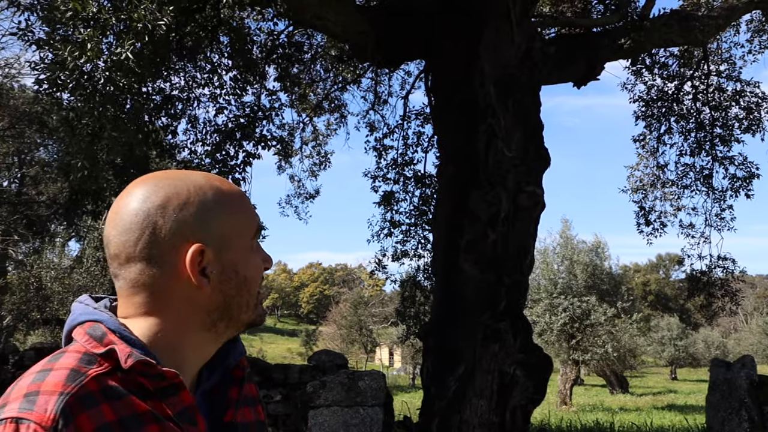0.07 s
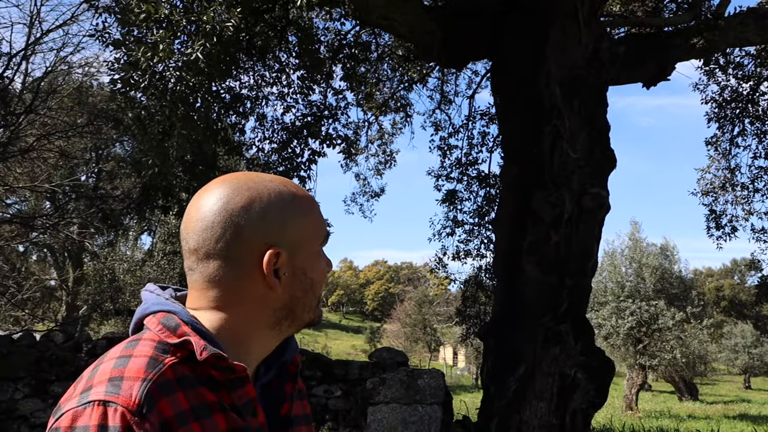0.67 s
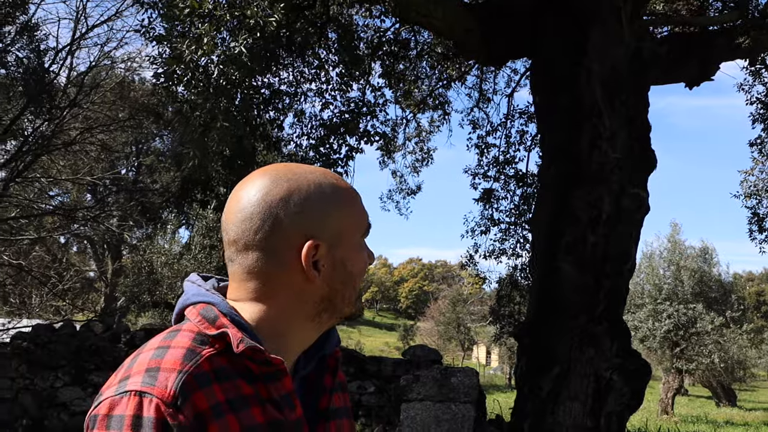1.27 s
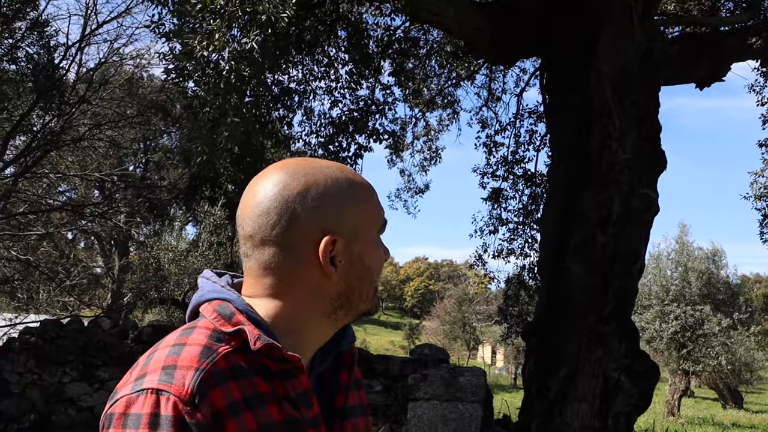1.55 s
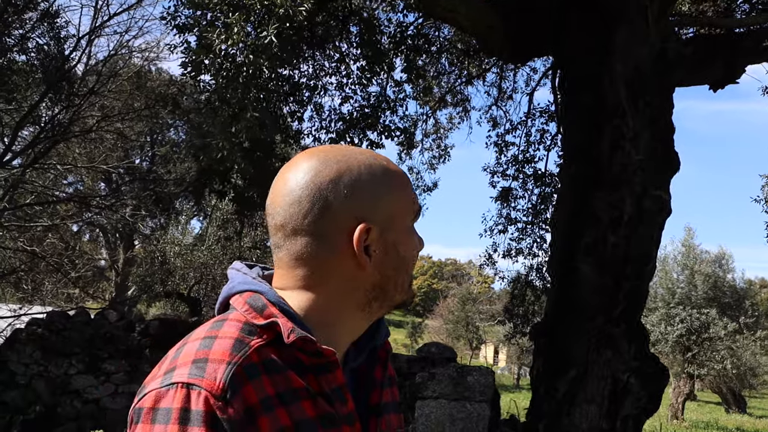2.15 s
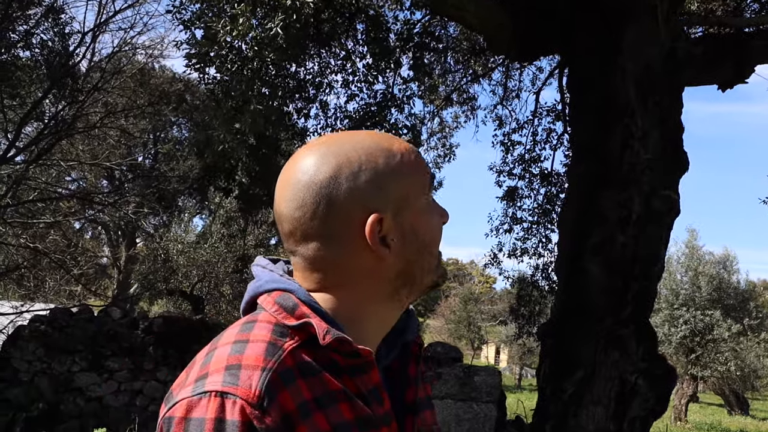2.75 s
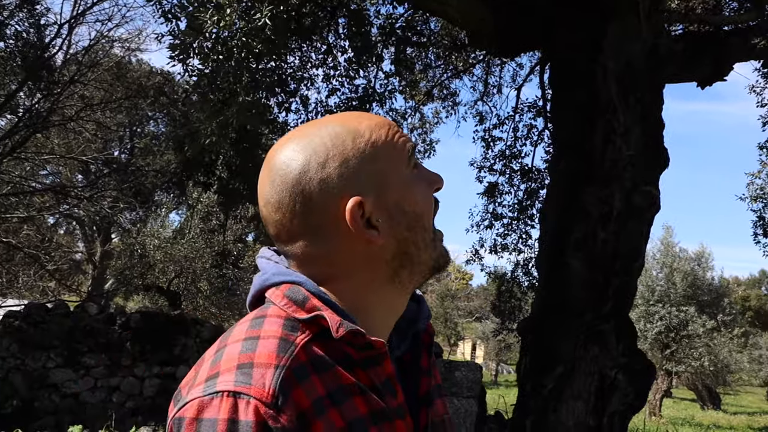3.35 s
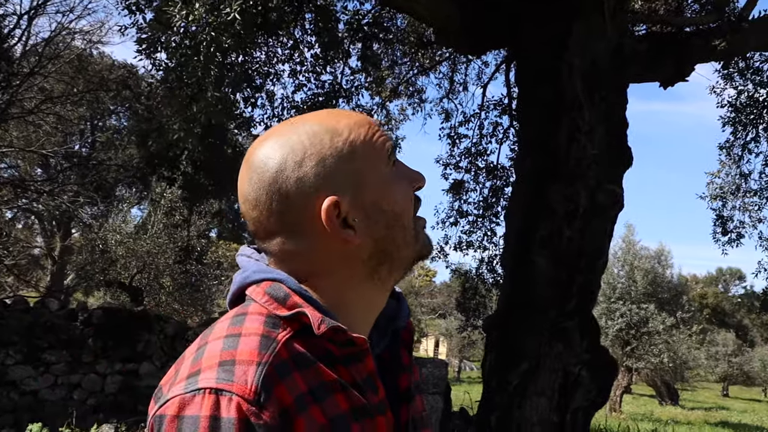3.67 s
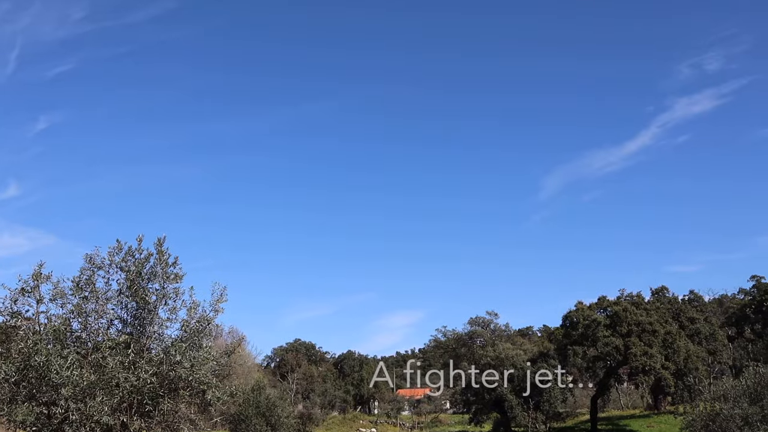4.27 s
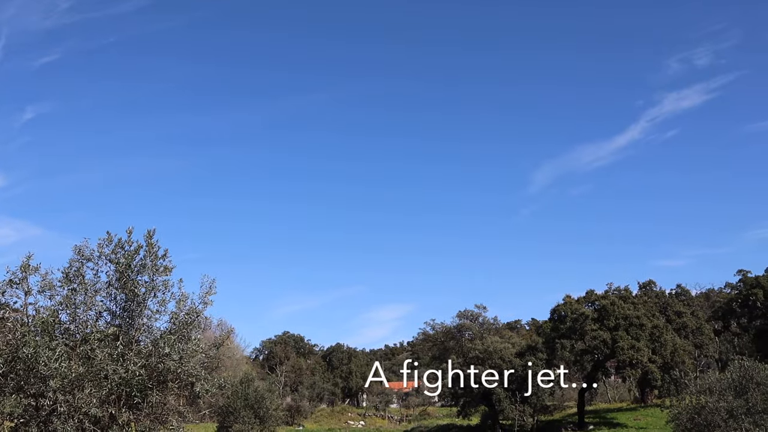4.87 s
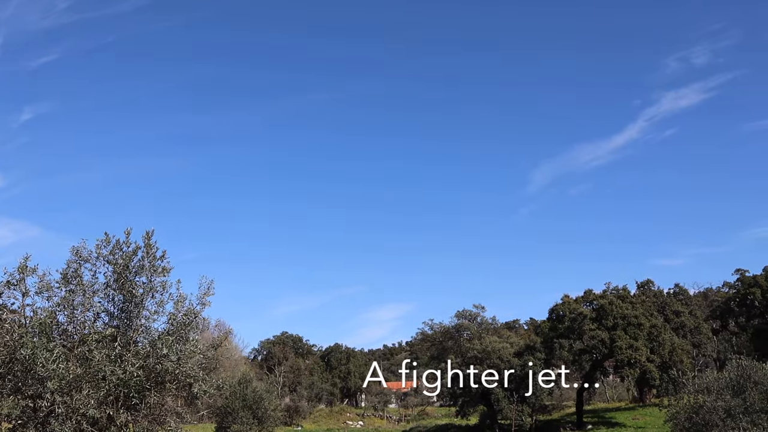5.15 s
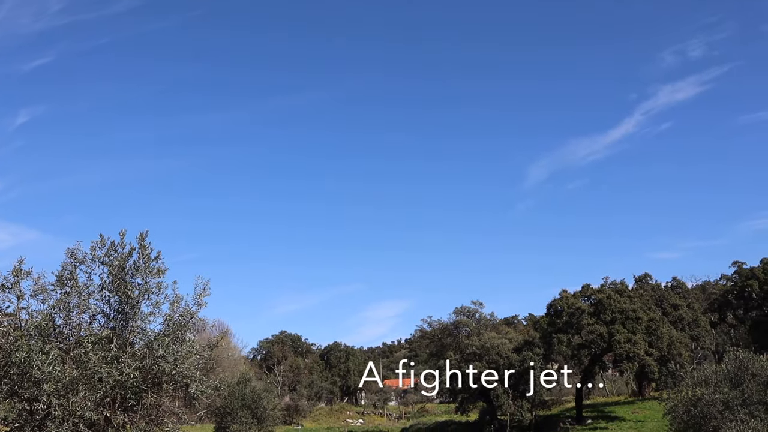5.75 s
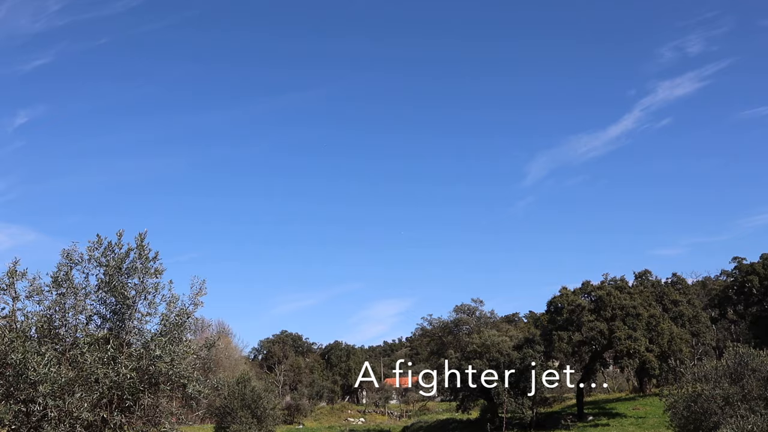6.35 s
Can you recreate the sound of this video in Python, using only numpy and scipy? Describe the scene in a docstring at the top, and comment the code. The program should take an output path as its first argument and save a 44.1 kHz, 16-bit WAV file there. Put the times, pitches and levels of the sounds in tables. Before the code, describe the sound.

The dull roar of a fighter jet swells far overhead, surging and rolling in the moving air. It peaks, then turns abruptly into a deeper, more distant rumble. Small birds give faint, buzzy calls and a short whistle from the trees. A few dry ticks sound close to the microphone, which stands under trees in open country, with a faint hiss underneath.

```python
"""The dull roar of a fighter jet swells far overhead, heard from under trees in open country.
The air takes the top off the exhaust noise, and turbulence on the way makes it surge and roll;
from 3.9 s on the jet is farther off, a deeper rumble. Small birds call in the trees with short,
buzzy glides. A few dry ticks and a soft swish sound close by, over faint electronic hiss and whine."""
import sys
import numpy as np
from scipy import signal
from scipy.fft import rfft, irfft
from scipy.io import wavfile
from scipy.ndimage import uniform_filter1d

SR = 44100
rng = np.random.default_rng(int(sys.argv[2]) if len(sys.argv) > 2 else 0)


def store_pcm(level_fs):
    """Save levels as 16-bit WAV."""
    pcm = np.round(np.clip(level_fs, -1, 1) * 32767).astype(np.int16)
    wavfile.write(sys.argv[1], SR, np.atleast_2d(pcm).T)


N = 287532
TIME = np.arange(N) / SR
BINS = np.maximum(np.arange(N // 2 + 1) * SR / N, 1)

FARTHER_S, CROSSFADE_S = 3.905, 0.037


def jet():
    """The exhaust roar after its long way down, split into rumble, roar and rush, each on its own fader."""
    far_mix = np.clip((TIME - FARTHER_S) / CROSSFADE_S + .5, 0, 1)
    away_s = np.maximum(TIME - FARTHER_S, 0)
    arriving = stray_paths(exhaust(far_mix, away_s), longest_s=.016, wander_s=0.000972, path_db=-12)
    rumble = low_part(arriving, edge_hz=409, order=12)
    rush = arriving - low_part(arriving, edge_hz=900, order=12)
    roar = arriving - rumble - rush
    bands = zip((rumble, roar, rush), jet_levels(far_mix, away_s))
    return sum(steady(band, window_s=0.09) * from_db(db) for band, db in bands) + flares()


# The exhaust's tone while it nears, at its loudest, once past and far off.
# Each row: frequency in Hz, relative level in dB.
NEARING_EQ = [(25, -44), (45, -24.5), (80, -23), (210, -23), (330, -14.5), (480, 2), (570, 1.5),
              (800, -7.5), (1050, -14.5), (1450, -30), (1900, -47), (2600, -83)]
LOUDEST_EQ = [(30, -46.5), (80, -26.5), (115, -30), (165, -24), (215, -30), (310, -21), (410, -15),
              (480, -6), (570, 1.5), (760, -3), (1050, -21), (1450, -27.5), (1900, -49), (2600, -74)]
PAST_EQ = [(30, -39), (95, -20), (200, -23), (275, -18), (440, -7), (620, 0.5), (800, -3.5), (1050, -10),
           (1450, -22), (1900, -37.5), (2600, -67.5)]
FAR_EQ = [(25, -48), (50, -24), (85, -6), (140, -13.5), (225, -2), (320, -0.5), (375, -2), (450, -7),
          (560, -2.5), (850, -12), (1400, -31), (1900, -46.5), (2600, -61.5)]
# The ground echo's low, sinking howl once the jet is past. Each row: time in seconds, centre in Hz.
GROUND_HOWL_GLIDE = [(2.9, 400.2), (3.3, 349), (3.8, 269.8)]


def exhaust(far_mix, away_s):
    """Exhaust mixing noise with howling bands in it; it deepens as the jet turns its tail."""
    stage, _, _, howl_hz = flyover()
    shares = [np.clip(1 - np.abs(stage - k), 0, 1) for k in range(3)]
    near = sum(np.sqrt(share) * noise(eq) for share, eq in zip(shares, (NEARING_EQ, LOUDEST_EQ, PAST_EQ)))
    near += from_db(-11.5) * howl(howl_hz, width_hz=163)
    near += from_db(-16.5) * shares[2] * howl(in_time(GROUND_HOWL_GLIDE)[0], width_hz=104)
    sagging_hz = 319.3 - 14 * away_s
    far = noise(FAR_EQ) + from_db(-7.5) * howl(sagging_hz, width_hz=140)
    return np.sqrt(1 - far_mix) * near + np.sqrt(far_mix) * far


# The jet's progress. Each row: time in seconds, stage (0 nearing, 1 loudest, 2 past).
PASS_PROGRESS = [(0.7, 0), (1.4, 0.3), (1.8, 1.03), (2.28, 1.12), (2.6, 1.25), (3.1, 1.92)]
# The mix at those stages. Each row: rumble and rush in dB against the roar, howl centre in Hz.
STAGE_MIX = [(-13.5, -12, 560), (-19, -16, 630), (-10.5, -13.5, 635)]


def flyover():
    """Stage, rumble dB, rush dB and howl centre at every sample, morphing as the jet passes."""
    stage, = in_time(PASS_PROGRESS)
    return [stage] + [np.interp(stage, range(3), column) for column in np.transpose(STAGE_MIX)]


# The fader ride on the near roar, before turbulence. Each row: time in seconds, level in dB.
ROAR_FADER = [(0, -43), (.25, -39), (.5, -36.5), (.63, -35), (.92, -33.5), (1.55, -35), (2.0, -31.5),
              (2.35, -29), (2.55, -32.5), (3.2, -32.6), (3.7, -34), (3.9, -36.5)]


def jet_levels(far_mix, away_s, fade_db_per_s=0.53):
    """Rumble, roar and rush in dB: tied to the pass while near, slowly fading once far off."""
    roar_db, = in_time(ROAR_FADER)
    _, rumble_db, rush_db, _ = flyover()
    near = roar_db + rumble_db, roar_db, roar_db + rush_db
    far = -38.5, -41, -55 + 7 * np.exp(-away_s / 0.43)   # the treble is the first to die away
    return [(1 - far_mix) * near_db + far_mix * (far_db - fade_db_per_s * away_s) + turbulence(band_hz)
            for near_db, far_db, band_hz in zip(near, far, (270, 610, 1150))]


# Big swells and dips. Each row: middle in seconds, half length in seconds, gain at the centre in dB,
# centre in Hz.
EDDY_SURGES = [(0.48, 0.056, -4, 900), (0.605, 0.025, 2.5, 1200), (0.903, 0.1, 1, 1200),
               (0.87, 0.09, -1, 260), (1.27, 0.04, 4, 230), (1.54, 0.082, -0.5, 1300),
               (1.746, 0.035, 2, 750), (1.945, 0.04, 4, 650), (2.07, 0.035, 2.5, 450),
               (2.15, 0.016, -5, 650), (2.228, 0.094, 7, 260), (2.3, 0.2, 1, 1110), (2.605, .04, 4.5, 1200),
               (2.857, 0.074, -0.5, 1300), (3.08, 0.054, 0, 230), (3.279, 0.033, 5, 1190),
               (3.4, .04, -4, 261), (3.525, 0.044, 2.5, 280), (3.718, 0.095, 7, 217.1),
               (3.7, .17, 2.5, 1200), (4.224, 0.074, 1, 250), (4.36, .04, -1, 280), (4.79, 0.14, 3, 266),
               (4.978, 0.062, -2, 300), (5.42, 0.086, 5.5, 273), (5.62, 0.1, 3.5, 607),
               (6.096, 0.046, 2, 520), (5.942, 0.07, -4, 403), (6.2, 0.06, 0.5, 300),
               (6.338, 0.032, 6, 780), (6.438, 0.1, 1, 238)]


def turbulence(band_hz, spread_octaves=1.1, roll_db=0.9, shimmer_db=0.86):
    """One band's gain in dB as eddies focus or scatter it: slow ones roll, many small ones shimmer."""
    surges = sum(db * np.exp(-((TIME - s) / half_s) ** 2 - (np.log2(band_hz / hz) / spread_octaves) ** 2)
                 for s, half_s, db, hz in EDDY_SURGES)
    return surges + roll_db * flutter(rate_hz=8.3) + shimmer_db * flutter(rate_hz=12)


def howl(centre_hz, width_hz, wander_hz=12.17):
    """A narrow, wandering band of noise where sound paths add up, rms 1."""
    phase = 2 * np.pi * np.cumsum(centre_hz + wander_hz * flutter(rate_hz=4.038)) / SR
    return flutter(width_hz / 2) * np.cos(phase) + flutter(width_hz / 2) * np.sin(phase)


def stray_paths(x, longest_s, wander_s, path_db, count=3):
    """Sound bent by moving air comes late by wandering delays, so the roar phases and rolls."""
    out = x.copy()
    for lag_s in np.linspace(longest_s / count, longest_s, count):
        late_s = lag_s * rng.uniform(0.7987, 1.1935) + wander_s * flutter(rate_hz=1.354)
        out += from_db(path_db) * flutter(rate_hz=2.37) * np.interp(TIME - late_s, TIME, x)
    return out


# Brief howls over the roar. Each row: middle in seconds, half length in seconds, level in dB, centre in Hz.
HOWL_FLARES = [(2.08, .025, -28, 571), (2.099, 0.041, -29.5, 770), (2.2, .025, -27.5, 570),
               (2.25, 0.024, -20, 561.5), (2.305, 0.032, -26, 700), (2.62, 0.034, -34.5, 620),
               (3.68, .04, -39.5, 660), (3.933, .02, -38, 320.6), (4.27, 0.042, -38, 225.4),
               (4.489, 0.032, -36.5, 349.8), (4.561, .028, -38.5, 230.7), (4.807, 0.052, -33, 331),
               (5.129, 0.045, -37, 311), (5.428, 0.026, -32.5, 315), (6.038, 0.038, -41, 215.8),
               (6.475, 0.034, -32, 262.4)]


def flares(width_hz=113, rise_octaves_per_s=1.5):
    """Sound paths fall into step for a moment, and a narrow howl flares up and slides upward."""
    real, imaginary = (steady(flutter(width_hz / 2), window_s=0.034) for _ in range(2))
    band = real + 1j * imaginary
    out = np.zeros(N)
    for s, half_s, db, centre_hz in HOWL_FLARES:
        at = np.flatnonzero(np.abs(TIME - s) < 2 * np.pi * half_s)
        t = TIME[at] - s
        phase = 2 * np.pi * np.cumsum(centre_hz * 2 ** (rise_octaves_per_s * t)) / SR
        stretch = band[rng.integers(N - SR) + np.arange(len(at))]
        out[at] += from_db(db) * np.exp(-(t / half_s) ** 2 / 2) * np.real(stretch * np.exp(1j * phase))
    return out


def birds(echo_db, t60, buzz_hz=281):
    """Each note is a straight or arched glide; a fast pitch warble makes it buzz, distance adds echo."""
    direct, scattered = np.zeros(N), np.zeros(N)
    waver = flutter(rate_hz=1150)
    for s, length, pitches, db, depth_hz, send in thin_calls() + chips() + slurs() + whistles():
        at = np.flatnonzero((TIME >= s) & (TIME < s + length))
        along = (TIME[at] - s) / length
        arch = np.polyfit(np.linspace(0, 1, len(pitches)), pitches, len(pitches) - 1)
        warble = (np.sin(2 * np.pi * buzz_hz * TIME[at]) + waver[at]) / 2
        phase = 2 * np.pi * np.cumsum(np.polyval(arch, along) + depth_hz * warble) / SR
        note = np.sqrt(2) * from_db(db) * np.sin(np.pi * along) ** 1.23 * np.sin(phase)
        direct[at] += note
        scattered[at] += send * note
    return direct + from_db(echo_db) * trees(scattered, t60)


# High, thin calls. Each row: start in seconds, opening pitch in Hz, level in dB.
THIN_CUES = [(.93, 7600, -62.5), (1.113, 7640, -58.5), (1.286, 7780, -58.5), (1.768, 7580, -62),
             (4.015, 7700, -70), (4.217, 7730, -67), (4.396, 7700, -66), (4.925, 7650, -64)]


def thin_calls(length_s=0.052, depth_hz=80, send=0.62):
    """The thin notes of a song from deep in the trees: each lifts a little, then sags."""
    return [(s, length_s, (hz, hz + 59, hz - 400), db, depth_hz, send) for s, hz, db in THIN_CUES]


# Raspy chips. Each row: start and spacing in seconds, level and drop per chip in dB, warble depth in Hz.
CHIP_CUES = [(1.425, .083, -64, 0, 430), (4.531, .087, -59, 0.5, 390)]


def chips(length_s=.05, send=0.32, lisp_lead_s=.013, lisp_db=-72.5, lisp_depth_hz=1000):
    """Three raspy chips follow the thin opening notes of the song; a faint lisp leads into each."""
    lisp_hz, arch_hz = (4900, 6860), (4140, 4540, 4470, 3550)   # the arch: a slow rise, a quick drop
    notes = []
    for start, spacing, db, drop_db, depth_hz in CHIP_CUES:
        for k in range(3):
            s = start + k * spacing
            notes.append((s - lisp_lead_s, length_s, lisp_hz, lisp_db, lisp_depth_hz, send))
            notes.append((s, length_s, arch_hz, db - k * drop_db, depth_hz, send))
    return notes


# A burst of twitter. Each row: start and length in seconds, first and last pitch in Hz, level in dB.
SLUR_CUES = [(3.624, 0.042, 5090, 6400, -63), (3.642, .022, 3902, 5600, -65), (3.68, .016, 6800, 2900, -62),
             (3.752, .018, 5430, 3700, -58), (3.755, .012, 5500, 6700, -62), (3.765, .013, 4600, 3300, -58),
             (3.767, 0.013, 6030, 3800, -57), (3.777, 0.0125, 5030, 3100, -60)]


def slurs(depth_hz=260, send=.2):
    """Notes of a nearer bird: quick, straight sweeps up or down."""
    return [(s, length, pitches, db, depth_hz, send) for s, length, *pitches, db in SLUR_CUES]


# Plain whistles. Each row: start and length in seconds, first, middle and last pitch in Hz, level in dB,
# echo send (0 close, 1 deep in the trees).
WHISTLE_CUES = [(3.831, 0.063, 3010, 3110, 3290, -49.5, .08), (5.745, 0.06, 5250, 5300, 5400, -73, .7),
                (6.023, .09, 4080, 4230, 3900, -72, .7)]


def whistles(depth_hz=60):
    """Nearly pure bird notes with a gentle bend."""
    return [(s, length, pitches, db, depth_hz, send) for s, length, *pitches, db, send in WHISTLE_CUES]


# Dry ticks. Each row: start in seconds, peak in dB, knock in Hz and its gain in dB, ring in Hz and its
# gain in dB, notch in Hz, top cut in Hz. Both gains are against the bare crack.
TICK_CUES = [(0.4785, -51, 2300, 9, 5500, 4, 3600, 6500), (2.177, -36.5, 2410, 8.5, 5900, 6, 4770, 6600),
             (2.5468, -25, 3400, 11.5, 5560, 11.5, 4210, 18000),
             (3.0238, -36, 2270, 10, 5490, 10, 4350, 11000),
             (3.470, -29, 1817, 23.5, 8200, 12.5, 3357, 18000),
             (3.8443, -35.5, 2690, 14, 5490, 1, 6400, 14030)]
# The bare crack's tone. Each row: frequency in Hz, relative level in dB.
CRACK_EQ = [(600, -9), (2000, 1.5), (4200, -1.5), (7000, -2), (11500, -4.5), (16000, -14)]


def ticks(t60, resonance_q, notch_q, echo_s, echo_db):
    """A crack of a few milliseconds with two broad resonances, a hollow and one weak echo from nearby."""
    out, grit = np.zeros(N), noise(CRACK_EQ)
    for s, db, knock_hz, knock_db, ring_hz, ring_db, notch_hz, top_hz in TICK_CUES:
        at = int(s * SR) + np.arange(SR // 50)
        crack = grit[at] * from_db(-60 * (TIME[at] - s) / t60)
        knock = signal.lfilter(*signal.iirpeak(knock_hz, resonance_q, fs=SR), crack)
        ring = signal.lfilter(*signal.iirpeak(ring_hz, resonance_q, fs=SR), crack)
        tick = crack + from_db(knock_db) * knock + from_db(ring_db) * ring
        tick = signal.lfilter(*signal.iirnotch(notch_hz, notch_q, fs=SR), tick)
        tick = signal.sosfilt(signal.butter(2, top_hz, fs=SR, output="sos"), tick)
        out[at] += from_db(db) * tick / np.abs(tick).max()
    return out + from_db(echo_db) * np.interp(TIME - echo_s, TIME, out)


# The swish's fader ride. Each row: time in seconds, level in dB.
SWISH_FADER = [(3.82, -93), (3.86, -73), (3.885, -64), (3.903, -60), (3.92, -91)]
# Its airy tone. Each row: frequency in Hz, relative level in dB.
SWISH_EQ = [(2500, -14), (6000, -7), (8000, -3), (11500, -9), (15000, -22)]


def swish():
    """Soft, bright noise that swells briefly and drops away."""
    return from_db(in_time(SWISH_FADER)[0]) * noise(SWISH_EQ)


def trees(x, t60):
    """The short diffuse tail that trunks and leaves scatter back."""
    t = TIME[:SR // 2]
    tail = rng.standard_normal(len(t)) * from_db(-60 * t / t60) * (t > .004)
    return signal.fftconvolve(x, tail / np.linalg.norm(tail))[:N]


def from_db(db):
    """Decibels to gain."""
    return 10 ** (np.asarray(db) / 20)


def in_time(rows):
    """Each column of an automation curve, at every sample."""
    s, *columns = np.transpose(rows)
    return [np.interp(TIME, s, column) for column in columns]


def rms_one(x):
    """Scale to unit rms."""
    return x / np.sqrt(np.mean(x ** 2) + 1e-20)


def noise(eq):
    """Noise through an EQ curve drawn on a log-frequency axis, rms 1."""
    hz, db = np.transpose(eq)
    gain = from_db(np.interp(np.log(BINS), np.log(hz), db))
    return rms_one(irfft(rfft(rng.standard_normal(N)) * gain, N))


def low_part(x, edge_hz, order):
    """A low-pass with no phase shift."""
    return irfft(rfft(x) / (1 + (BINS / edge_hz) ** order), N)


def steady(x, window_s):
    """Noise with its slow swells evened out, rms 1."""
    return x / np.sqrt(uniform_filter1d(x ** 2, max(int(window_s * SR), 2)) + 1e-12)


def flutter(rate_hz):
    """Smooth random movement up to a given rate, rms 1."""
    return rms_one(low_part(rng.standard_normal(N), rate_hz, order=4))


def scene():
    """Jet, birds and small near sounds, in mono."""
    close = swish()
    cracks = ticks(t60=0.0066, resonance_q=3.2, notch_q=6.6, echo_s=0.0064, echo_db=-17.5)
    close += cracks + from_db(-16.5) * trees(cracks, t60=0.14)
    return (jet() + birds(echo_db=3.0, t60=0.2) + close)[None]


# The hiss bed's tone. Each row: frequency in Hz, relative level in dB.
HISS_EQ = [(200, -0.5), (2000, 0.5), (3200, 0), (5000, -1.5), (7000, -2), (10000, -4), (12200, -3.5),
           (13500, -4.5), (16000, -5.5)]
# A faint electronic whine. Each row: frequency in Hz, level in dB.
WHINE_TONES = [(2000, -83.5), (2500, -85.5), (3000, -84), (3500, -85.5), (4000, -85.5), (4500, -89),
               (5000, -85.5), (5500, -87.5)]
SIZZLE_HZ, SIZZLE_WIDTH_HZ, PULSES_PER_S = 12000, 550, 24


def record(dry):
    """The electronics add hiss, a faint whine and a thin pulsing sizzle; the top is cut."""
    whine = sum(np.sqrt(2) * from_db(db) * np.sin(2 * np.pi * (hz * TIME + rng.random()))
                for hz, db in WHINE_TONES)
    sizzle = flutter(SIZZLE_WIDTH_HZ / 2) * np.sin(2 * np.pi * SIZZLE_HZ * TIME)
    pulsing = from_db(-82.5) * rms_one(sizzle * np.sin(np.pi * PULSES_PER_S * TIME) ** 2)
    hiss = from_db(-65.5) * noise(HISS_EQ)
    return low_part(dry + hiss + whine + pulsing, edge_hz=15800, order=400)


dry = scene()
out = record(dry)
store_pcm(out)
```